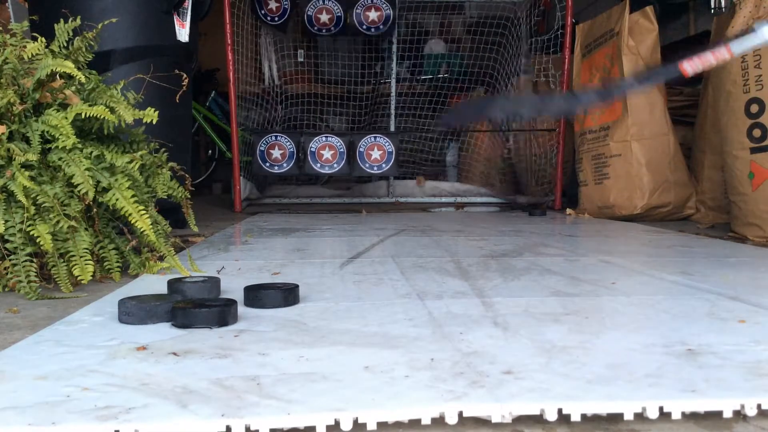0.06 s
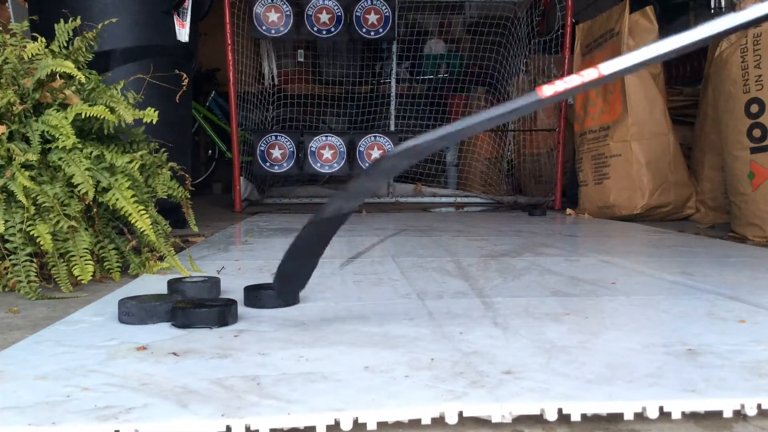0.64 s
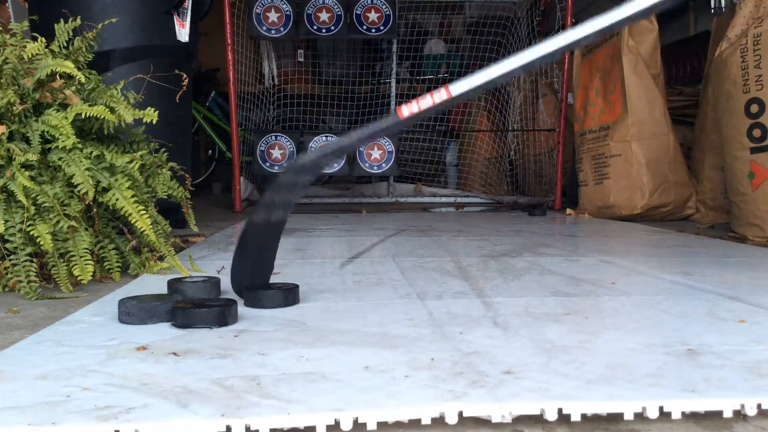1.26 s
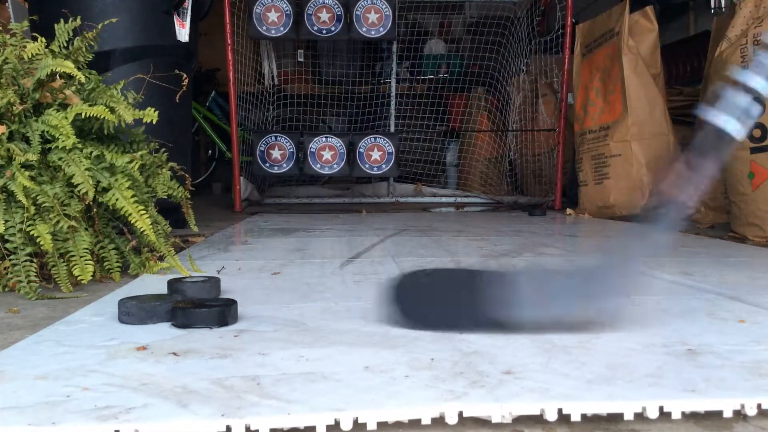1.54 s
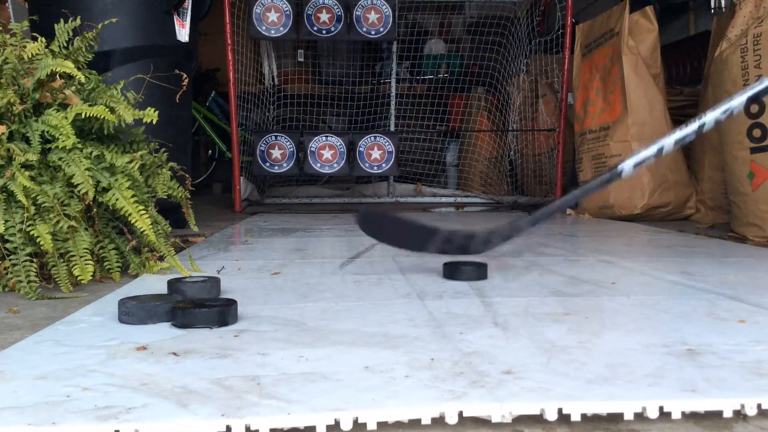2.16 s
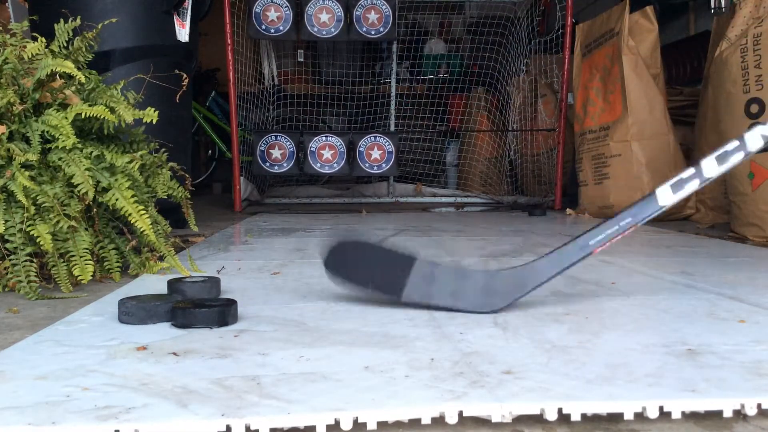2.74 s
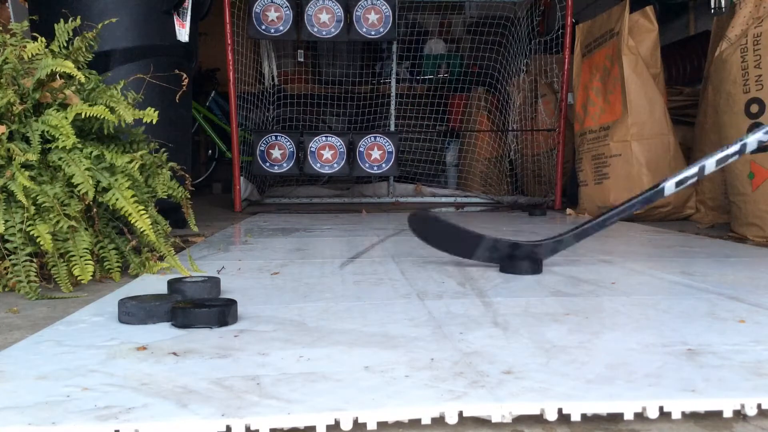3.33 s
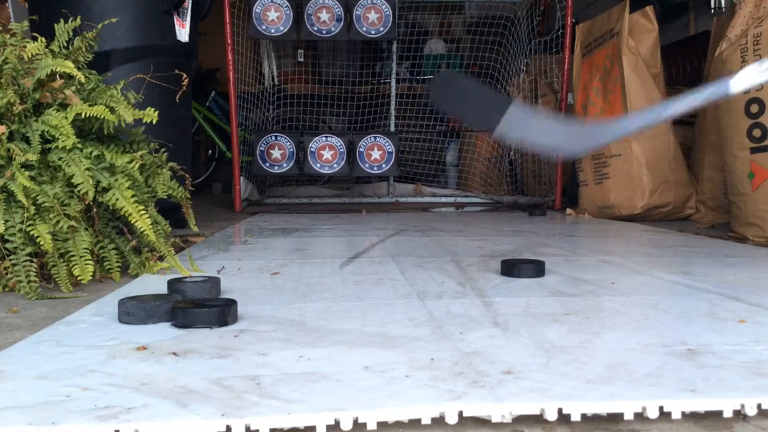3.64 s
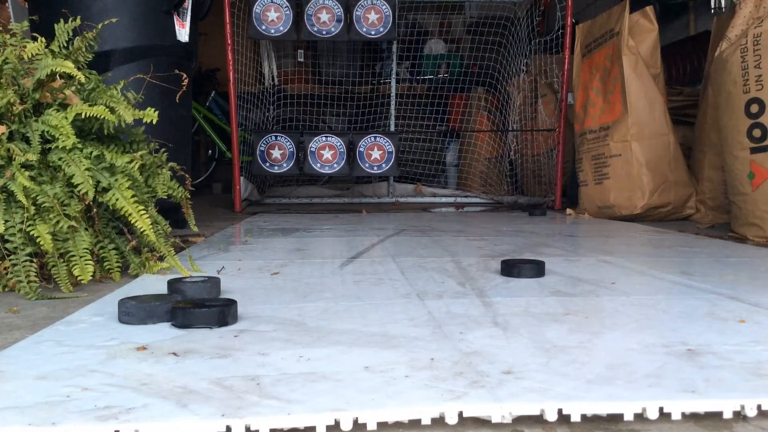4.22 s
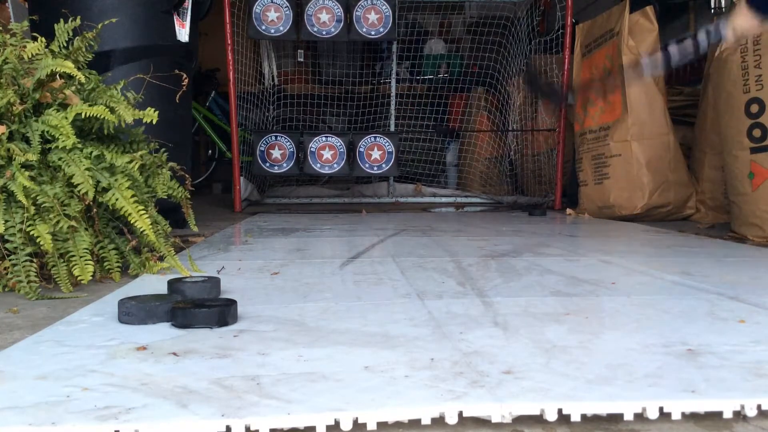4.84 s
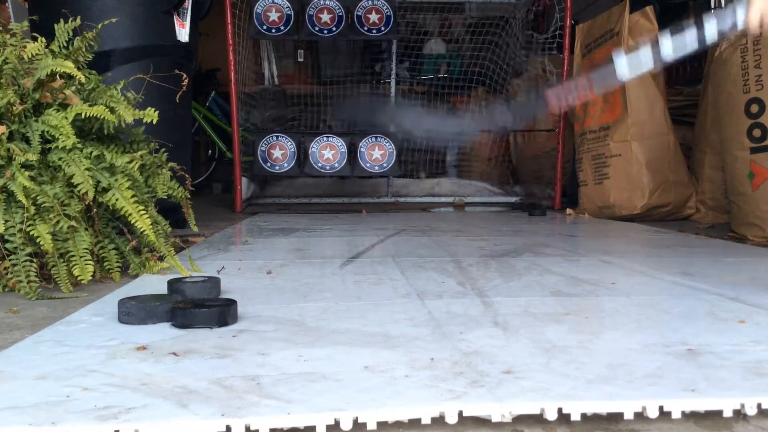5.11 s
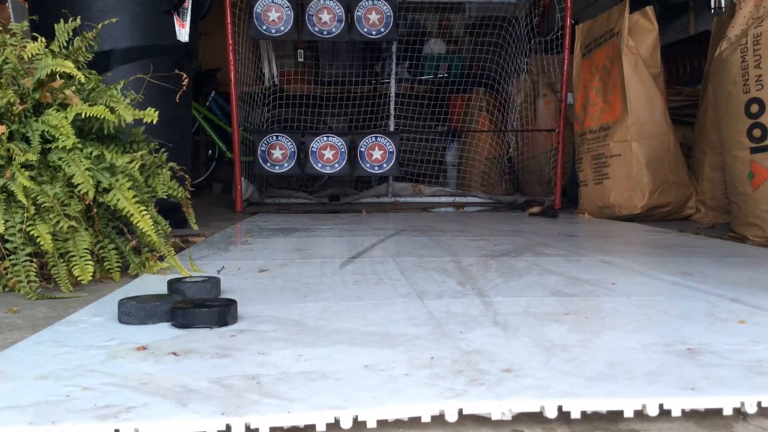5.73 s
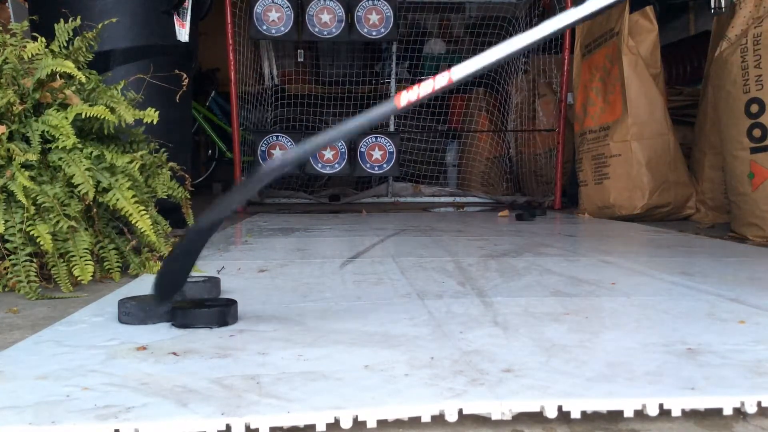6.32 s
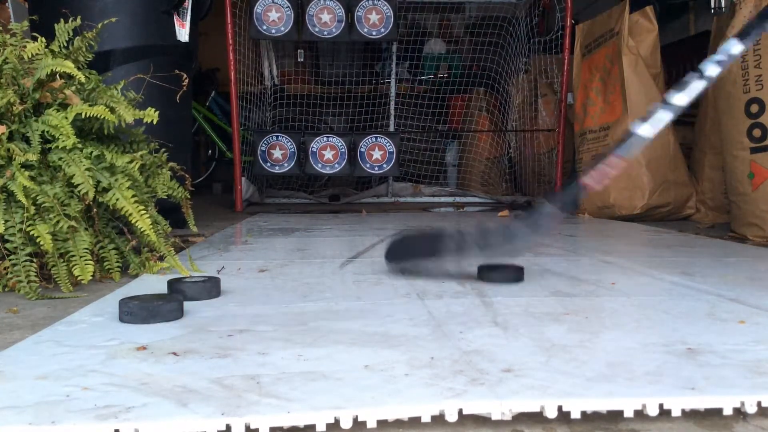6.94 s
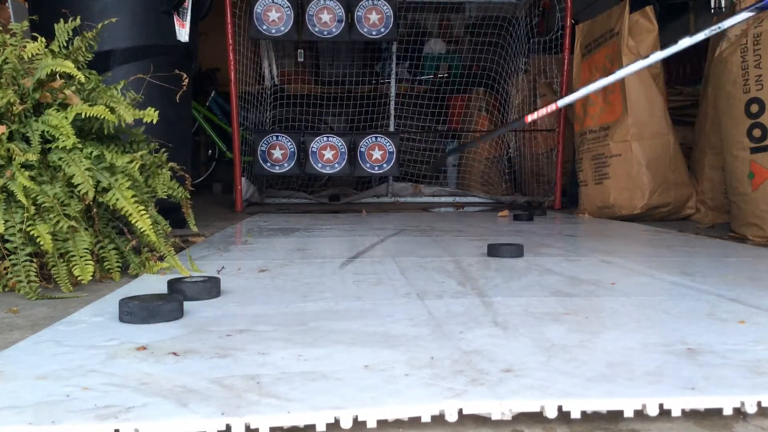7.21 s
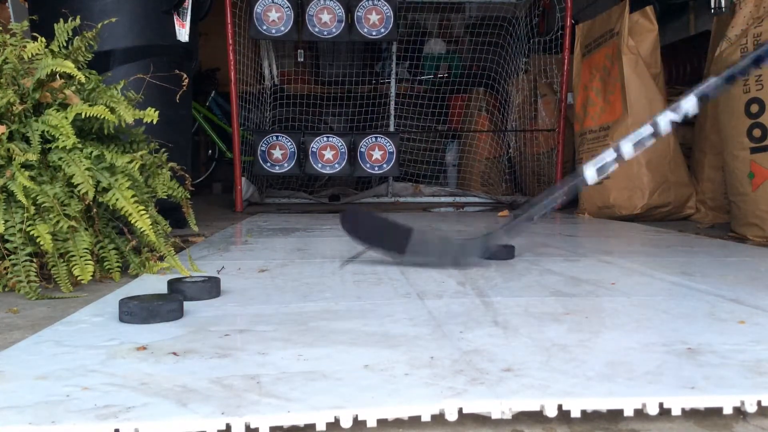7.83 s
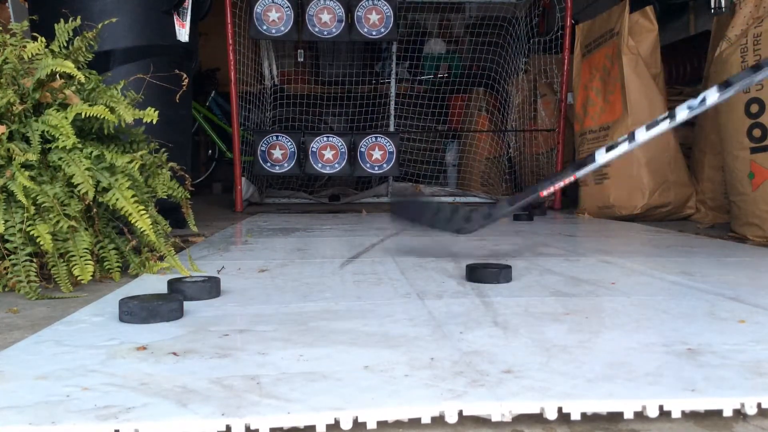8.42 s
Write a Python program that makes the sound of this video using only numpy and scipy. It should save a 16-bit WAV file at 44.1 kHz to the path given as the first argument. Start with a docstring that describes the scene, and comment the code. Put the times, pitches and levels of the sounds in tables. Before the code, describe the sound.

In a garage with a short echo, someone handles pucks with a hockey stick on plastic flooring. After an opening scrape comes an uneven run of boomy blade slaps, hard clacks and brief slides. A lull ends in one sharp shot, followed by knocks and a puck wobbling on its rim with a low, wavering note. The knocking then resumes, its strongest blows pushing the microphone into slight overload.

```python
"""First a hissing scrape: a hockey stick's blade dragged over a plastic floor in a garage. The blade slaps
the floor, which booms, and clacks against pucks; they slide with a rush that sinks as friction slows them.
A hard shot sends one away; it lands and rolls, each wobble drawing a note from the floor. The stick ticks
faintly in the hands. The garage answers every blow; the loudest overload the microphone a little."""
import sys
import numpy as np
from scipy import signal
from scipy.fft import rfft, irfft, next_fast_len
from scipy.io import wavfile
from scipy.ndimage import uniform_filter1d, map_coordinates

SR = 44100
rng = np.random.default_rng(int(sys.argv[2]) if len(sys.argv) > 2 else 0)


def wrap_up_sound(samples):
    """Save the sound to the file named by the first command line argument, as 16-bit audio."""
    columns = np.atleast_2d(samples).T
    # keep every value between -1 and 1, then stretch to whole-number steps
    tamed = np.clip(columns, -1, 1)
    steps = np.round(tamed * 32767).astype(np.int16)
    wavfile.write(sys.argv[1], SR, steps)


N = 377804
TIME_S = np.arange(N) / SR
AGE_S = np.arange(SR // 2) / SR  # time since a blow

# Table levels are relative.
# blade dragged hard: t/s, hiss/dB, chatter/dB, buffet/dB, rise/s, hold/s, t60/s
BLADE_STROKES = [(0.048, -16, -17, -33, 0.0097, 0.0085, 0.3), (1.59, -35.5, -32, -47, 0.004, 0.016, 0.18),
                 (4.511, -35.5, -35.5, -50, 0.0098, 0.044, 0.55),
                 (4.78, -23.5, -25, -43.5, 0.006, 0.027, 0.31),
                 (5.1, -25.5, -27.5, -38.5, 0.0061, 0.034, 0.54),
                 (5.353, -39.5, -39, -51, 0.0019, 0.014, 0.91), (5.45, -59, -35, -35, 0.013, 0.027, 0.63),
                 (5.669, -32.5, -35.5, -44.5, 0.0019, 0.092, 0.33),
                 (6.79, -37.5, -35.5, -49, 0.058, .12, 0.62)]
# puck or blade pushed into a slide: t/s, hold/s, t60/s, dust/dB, rub/dB, starting centre/Hz
SLIDE_PUSHES = [(0.258, 0.057, 0.75, -50.5, -60, 1190), (0.503, .01, .3, -63, -60, 1700),
                (1.469, 0.075, 0.65, -45, -42, 1103), (1.66, 0.12, 1.0, -42, -45.5, 1300),
                (1.996, 0.079, 0.46, -48.5, -37, 1151), (2.2, 0.11, 0.62, -50, -43, 1047),
                (2.682, 0.12, 0.32, -45.5, -50, 1004), (3.002, 0.096, 0.51, -44, -43, 898),
                (3.135, 0.089, 0.69, -41.5, -36.5, 1243), (3.734, 0.17, 0.36, -60, -59, 1494),
                (4.133, 0.32, .4, -61.5, -74, 1287), (5.912, .05, .7, -53.5, -60, 905.6),
                (6.689, 0.049, .6, -45, -36.5, 1498), (7.021, .14, 0.57, -39, -42, 1494),
                (7.219, .05, .45, -49.5, -31, 1147), (7.3, .03, .3, -67, -35, 450.4),
                (7.427, 0.07, 0.44, -64, -49.5, 650.6)]
# blows: t/s, force/dB, blade/dB, grit/dB
FLOOR_SLAPS = [(0.28, -27, -48, -52), (0.316, -31, -37, -44), (1.329, -13, -13.5, -38.5),
               (1.63, -16, -15, -21.5), (1.801, -25, -25.5, -27), (1.867, -26, -52, -37),
               (2.111, -11.5, -15, -14.5), (2.353, -14, -9.5, -14.5), (2.412, -15.5, -15.5, -21.5),
               (2.567, -12.5, -11, -16.5), (2.73, -22, -19.5, -35), (2.822, -13, -13.5, -16),
               (3.378, -13.5, -15, -25), (5.252, -12, -16.5, -44), (5.610, -12.5, -20.5, -20.5),
               (5.721, -21.5, -43, -50), (5.776, -10.5, -16.5, -19.5), (6.206, -19.5, -29.5, -45.5),
               (7.701, -10, -16.5, -15), (7.948, -10.5, -14, -19.5), (8.128, -10.5, -21, -21.5),
               (8.349, -10.5, -13, -16.5)]  # blade or puck landing flat
PUCK_CLACKS = [(1.69, -11.5, -24, -51), (2.164, -11.5, -11, -27), (2.602, -14, -18.5, -19),
               (3.427, -16.5, -16, -24), (4.786, -13, -8, -9.5), (4.793, -23, -8.5, -7),
               (4.832, -27, -9, -6.5), (5.277, -18, -41, -48), (5.442, -32, -22, -26),
               (5.462, -31, -22.5, -22), (6.492, -25.5, -60, -52.5), (6.551, -18, -44, -45.5),
               (6.871, -11.5, -10.5, -28), (7.802, -14, -11, -20), (8.203, -12.5, -15.5, -20),
               (8.447, -14, -12.5, -21.5)]  # blade or puck against puck
# light touches of the blade: t/s, force/dB
BLADE_TAPS = [(1.089, -46), (1.165, -48.5), (1.46, -25.5), (1.475, -33), (1.491, -36.5), (1.511, -25),
              (2.043, -35.5), (2.986, -32), (4.002, -29.5), (4.039, -28.5), (4.055, -34.5), (4.299, -49.5),
              (4.422, -41.5), (4.436, -49)]
# puck wobbling on its rim: t/s, lurch period/s, level/dB, f/Hz
ROLL_PATH = [(5.797, 0.097, -17.5, 414), (6.0, 0.1, -24.5, 354), (6.299, .108, -27, 359.6),
             (6.651, 0.074, -23, 384.3), (6.95, 0.062, -28.5, 398)]

# modes: f/Hz, level/dB, t60/s
HEAVE_MODES = [(330, -8.5, 0.0067), (624, 3, 0.0098), (983, 0, 0.0087), (1704.4, -6.5, .008),
               (2174, -13, 0.0098)]  # first heave of a contact
FLOOR_MODES = [(204.4, -10.5, 0.19), (293.4, -5.5, 0.25), (371.6, 4, 0.11), (470.2, 1.5, 0.12),
               (579, -9, 0.096), (715, 8.5, .05)]
BLADE_MODES = [(980, 2, 0.1), (1044, 10, 0.041), (1140, -14.5, 0.052), (1513, -5, 0.097), (1752, -1, 0.068),
               (2037, 0.5, 0.019), (2340, -4.5, 0.015), (2490, -5.5, 0.048)]

# noise spectra: f/Hz, level/dB
SCRAPE_SPECTRUM = [(100, -36), (800, -29.5), (2200, -21), (3200, 1.5), (6800, 3), (8300, 8), (9400, 10),
                   (11000, -2), (13000, -12), (16000, -21)]
CHATTER_SPECTRUM = [(30, -21), (100, -11.5), (220, -5), (350, -0.5), (550, 0.5), (800, -6), (1200, -8),
                    (2300, -10.5), (3500, -14.5), (8000, -27.5), (14000, -60)]
BUFFET_SPECTRUM = [(15, -59), (25, -18.5), (38, -29.5), (75, 4), (100, -4), (140, -3.5), (170, -2.5),
                   (220, -10), (370, -120)]
GRIT_SPECTRUM = [(300, -25), (1500, 2), (2400, -1.5), (3000, 1), (6800, -1), (8300, 5), (9400, 6),
                 (10800, -6.5), (12500, -9.5), (16000, -14)]
RUB_SPECTRUM = [(40, -37), (130, -32.5), (250, -6.5), (400, 0.5), (650, 0.5), (1000, 1), (1350, -3),
                (2100, -9.5), (3000, -18.5), (8000, -48.5), (16000, -85.5)]  # at a centre of 1 kHz
DUST_SPECTRUM = [(500, -16), (2200, 4), (2900, -3.5), (3500, -1), (4500, -4.5), (6800, -1), (8300, 3.5),
                 (9500, 5), (11000, -11.5), (13000, -22.5), (16000, -32.5)]
BOOM_SPECTRUM = [(30, -83), (100, -8.5), (200, -5), (380, 4), (600, 4), (1000, -12), (1600, -16),
                 (3000, -37), (8000, -60.5), (16000, -87)]
SMACK_SPECTRUM = [(300, -25.5), (800, 2), (1100, 7), (1700, -4.5), (2400, -0.5), (2900, -11), (3600, -12),
                  (6000, -16), (10000, -35.5), (16000, -51.5)]
RUMBLE_SPECTRUM = [(60, -60), (130, -37), (220, -4.5), (330, 0), (450, 1), (650, -8.5), (1050, -18),
                   (1500, -34.5), (5000, -59), (16000, -110)]
AIR_SPECTRUM = [(15, -55), (25, -24), (70, 0), (185, -9), (212, -4.5), (242, -7.5), (317, -5), (560, -11),
                (1440, -16), (2910, -26.5), (3620, -26.5), (5730, -25), (10100, -19), (16000, -57.5)]

# garage reverberation: f/Hz, t60/s
GARAGE_DECAY = [(100, 0.41), (250, 0.49), (600, 0.27), (2000, 0.32), (6000, 0.29), (10000, 0.083),
                (16000, 0.58)]
# nearest surfaces: delay/s, level/dB
NEAR_ECHOES = [(.0034, -26.5), (0.0114, -22.5), (0.0205, -26)]


def amp(db):
    """Decibels to gain."""
    return 10 ** (np.asarray(db) / 20)


def unit(x):
    """Scale to rms 1."""
    return x / np.sqrt(np.mean(x ** 2) + 1e-20)


def burst(x):
    """Scale to rms 1 over the first 20 ms."""
    return x / np.sqrt(np.mean(x[:SR // 50] ** 2) + 1e-20)


def fade(t_s, t60_s):
    """Exponential decay."""
    return np.exp(-np.log(1000) * t_s / t60_s)


def along(points, hz):
    """Read (f/Hz, value) points on a log axis."""
    knots_hz, values = np.transpose(points)
    return np.interp(np.log(hz + 1), np.log(knots_hz + 1), values)


def wobble(rate_hz, n):
    """Smooth random curve, rate_hz knots a second."""
    knots = rng.standard_normal(int(n * rate_hz / SR) + 4)
    return map_coordinates(knots, [np.arange(n) * rate_hz / SR])


def coloured(x, spectrum):
    """Filter by a spectrum; rms 1."""
    size = next_fast_len(len(x) + SR // 5)
    gain = amp(along(spectrum, np.fft.rfftfreq(size, 1 / SR)))
    return unit(irfft(rfft(x, size) * gain, size)[:len(x)])


def noise(spectrum, n=len(AGE_S)):
    """Coloured noise, rms 1."""
    return coloured(rng.standard_normal(n), spectrum)


def pressure(start_s, rise_s, hold_s, t60_s):
    """A rubbing contact builds up to start_s, holds, releases."""
    build = np.exp(np.minimum(TIME_S - start_s, 0) / rise_s)
    return build * fade(np.maximum(TIME_S - start_s - hold_s, 0), t60_s)


def friction(spectrum, grain_db, patchy_db):
    """Tiny uneven catches; their colour shifts as the contact moves."""
    catches = rng.standard_normal(N) * amp(grain_db * wobble(1500, N))
    bins = signal.stft(catches, nperseg=512)[2]
    patches = uniform_filter1d(rng.standard_normal(bins.shape), size=3, axis=0)
    patches = unit(uniform_filter1d(patches, size=5, axis=1))
    patchy = signal.istft(bins * amp(patchy_db * patches), nperseg=512)[1][:N]
    return coloured(patchy, spectrum)


def garage(x, wet_db):
    """Add near reflections and the room's diffuse tail."""
    hz, t_s, bins = signal.stft(rng.standard_normal(len(AGE_S)), SR, nperseg=256)
    bins = bins * fade(t_s, along(GARAGE_DECAY, hz)[:, None])
    tail = signal.istft(bins, SR, nperseg=256)[1][:len(AGE_S)]
    tail *= np.clip((AGE_S - 0.006) / 0.011, 0, 1)
    response = amp(wet_db) * tail / np.linalg.norm(tail)
    for delay_s, db in NEAR_ECHOES:
        response[round(delay_s * SR)] += amp(db)
    return x + signal.fftconvolve(x, response)[:len(x)]


def blade_strokes():
    """The blade bites, drags and lets go; the fast swing buffets the air."""
    hiss, chatter, buffet = np.zeros((3, N))
    for start_s, hiss_db, chatter_db, buffet_db, rise_s, hold_s, t60_s in BLADE_STROKES:
        contact = pressure(start_s, rise_s, hold_s, t60_s)
        hiss += amp(hiss_db) * contact
        chatter += amp(chatter_db) * contact
        buffet += amp(buffet_db) * contact
    hiss *= friction(SCRAPE_SPECTRUM, grain_db=2, patchy_db=1.5)
    chatter *= friction(CHATTER_SPECTRUM, grain_db=1, patchy_db=5.5)
    return garage(hiss + chatter, wet_db=-15.5) + buffet * noise(BUFFET_SPECTRUM, N)


def still_air():
    """Faint room noise, its level drifting."""
    return amp(-62 + 1.2 * wobble(1.6, N)) * noise(AIR_SPECTRUM, N)


def handling_ticks(count=60, level_db=-66, spread_db=4.5):
    """The stick ticks in the hands at random moments."""
    out = np.zeros(N + SR)
    for start_s, size in zip(rng.uniform(0, N / SR, count), rng.standard_normal(count)):
        tick = burst(noise(GRIT_SPECTRUM) * fade(AGE_S, t60_s=0.05))
        out[round(start_s * SR):][:len(AGE_S)] += amp(level_db + spread_db * size) * tick
    return garage(out[:N], wet_db=0.5)


def slides(shot_hz=1056, sag_oct_per_s=3.2, settle_db_per_s=42, dust_loss_db_per_s=7.5, catch_db=1.8):
    """A puck reads the floor's texture at its own speed: its rush sinks as it slows. Dust hisses."""
    shot = amp(-16) * pressure(start_s=4.796, rise_s=0.0024, hold_s=0.0416, t60_s=0.33)
    rub, weighted_hz, dust = shot.copy(), shot_hz * shot, np.zeros(N)
    for start_s, hold_s, t60_s, dust_db, rub_db, centre_hz in SLIDE_PUSHES:
        contact = pressure(start_s, 0.025, hold_s, t60_s)
        # settling flat, it rubs more and hisses less
        held_s = np.clip(TIME_S - start_s, 0, hold_s)
        rubbing = contact * amp(rub_db + settle_db_per_s * held_s)
        dust += contact * amp(dust_db - dust_loss_db_per_s * held_s)
        rub += rubbing
        sag_oct = sag_oct_per_s * np.clip(TIME_S - start_s, 0, 0.5)
        weighted_hz += rubbing * centre_hz * 2 ** -sag_oct
    speed = weighted_hz / (rub + 1e-20) / 1000  # mean centre over the texture's 1 kHz
    position = np.cumsum(speed) % (N - 1)
    texture = friction(RUB_SPECTRUM, grain_db=3, patchy_db=4)
    rush = rub * amp(catch_db * wobble(60, N)) * map_coordinates(texture, [position])
    dust *= friction(DUST_SPECTRUM, grain_db=3.5, patchy_db=4)
    return garage(amp(-2.5) * rush + amp(2) * dust, wet_db=-9)


def ring(modes, detune):
    """Modes struck at random strengths; the contact point shifts them slightly."""
    hz, db, t60_s = np.transpose(modes)[:, :, None]
    size, shift = rng.standard_normal((2, len(modes), 1))
    sign = (-1) ** np.arange(len(modes))[:, None]
    waves = sign * np.sin(2 * np.pi * hz * (1 + detune * shift) * AGE_S)
    return burst(np.sum(amp(db + 2 * size) * fade(AGE_S, t60_s) * waves, axis=0))


def blows(rows, heave_db, boom_db, boom_t60_s, ring_db, smack_db, smack_t60_s,
          tick_db, skid_db, skid_t60_s, wet_db):
    """Each contact: one heave, floor boom, blade ring, a tick of grit, a short skid."""
    out = np.zeros(N + SR)
    cushion = signal.butter(4, 5000, fs=SR, output="sos")
    grit_lowpass = signal.butter(6, 10800, fs=SR, output="sos")
    for start_s, force_db, blade_db, grit_db in rows:
        # harder is sharper: the heave grows faster than the boom
        heave = ring(HEAVE_MODES, detune=0.093)
        heave *= amp(heave_db + 1.565 * force_db) / np.abs(heave).max()
        # dense bending waves over the floor's few strong modes
        floor = burst(noise(BOOM_SPECTRUM) * fade(AGE_S, boom_t60_s))
        floor += amp(-8) * ring(FLOOR_MODES, detune=0.054)
        floor = amp(force_db + boom_db) * burst(floor * (1 - np.exp(-AGE_S / 0.013)))
        # tape damps the blade: a dry smack beside the ring
        smack = amp(smack_db) * burst(noise(SMACK_SPECTRUM) * fade(AGE_S, smack_t60_s))
        blade = amp(blade_db) * (amp(ring_db) * ring(BLADE_MODES, detune=0.029) + smack)
        tick = amp(tick_db) * fade(AGE_S, t60_s=0.0046)
        skid = amp(skid_db) * fade(AGE_S, skid_t60_s)
        grit = signal.sosfilt(grit_lowpass, amp(grit_db) * (tick + skid) * noise(GRIT_SPECTRUM))
        # rubber and tape cushion all but the grit
        knock = signal.sosfilt(cushion, heave + floor + blade)
        out[round(start_s * SR):][:len(AGE_S)] += garage(knock + grit, wet_db)
    # high-pass keeps deep bass out of the knocks
    return signal.sosfilt(signal.butter(2, 105, "highpass", fs=SR, output="sos"), out[:N])


def rolling_puck(lurches=14, note_s=0.0929, arch=0.2515, waver=0.061, scatter=0.045):
    """Each lurch on the rim rumbles and draws a rising, falling note from the floor."""
    out = np.zeros(N + SR)
    swell = np.sin(np.pi * np.clip(AGE_S / note_s, 0, 1))
    lean = (1 - np.exp(-AGE_S / 0.01)) * fade(AGE_S, t60_s=0.17)
    times_s, *controls = np.transpose(ROLL_PATH)
    start_s = times_s[0]
    for shift in rng.standard_normal(lurches):
        period_s, db, hz = (np.interp(start_s, times_s, control) for control in controls)
        pitch_hz = hz * (1 + scatter * shift - arch * (1 - swell) + waver * wobble(143.8, len(AGE_S)))
        note = amp(-1) * swell ** 2 * np.sin(2 * np.pi * np.cumsum(pitch_hz) / SR)
        rumble = amp(-2.5) * burst(lean * noise(RUMBLE_SPECTRUM))
        dust = amp(-37) * burst(lean * noise(DUST_SPECTRUM))
        out[round(start_s * SR):][:len(AGE_S)] += amp(db) * (note + rumble + dust)
        start_s += period_s
    return garage(out[:N], wet_db=-6.5)


def scene():
    """Stick, pucks and floor over the garage's still air; mono."""
    slaps = blows(FLOOR_SLAPS, heave_db=15, boom_db=-2, boom_t60_s=0.068,
                  ring_db=-9, smack_db=-10.5, smack_t60_s=0.048,
                  tick_db=6, skid_db=-9.5, skid_t60_s=0.26, wet_db=-6)
    taps = [(start_s, force_db, force_db - 1.5, force_db - 7) for start_s, force_db in BLADE_TAPS]
    clacks = blows(PUCK_CLACKS + taps, heave_db=17.5, boom_db=-8, boom_t60_s=0.048,
                   ring_db=-14.5, smack_db=-7, smack_t60_s=0.069,
                   tick_db=2, skid_db=-8, skid_t60_s=0.25, wet_db=-7)
    mix = still_air() + blade_strokes() + slides() + slaps + clacks + rolling_puck() + handling_ticks()
    return mix[None]


def record(dry):
    """Microphone overload rounds peaks near full scale; 16 kHz band limit."""
    rounded = dry / (1 + np.abs(dry) ** 6) ** (1 / 6)
    size = next_fast_len(N + SR // 5)
    passband = 1 / (1 + (np.fft.rfftfreq(size, 1 / SR) / 16000) ** 90)
    return irfft(rfft(rounded, size) * passband, size)[..., :N]


dry = scene()
out = record(dry)
wrap_up_sound(out)
```